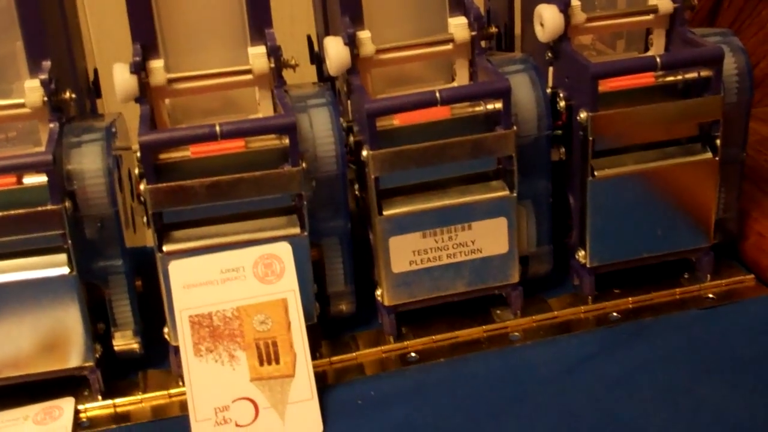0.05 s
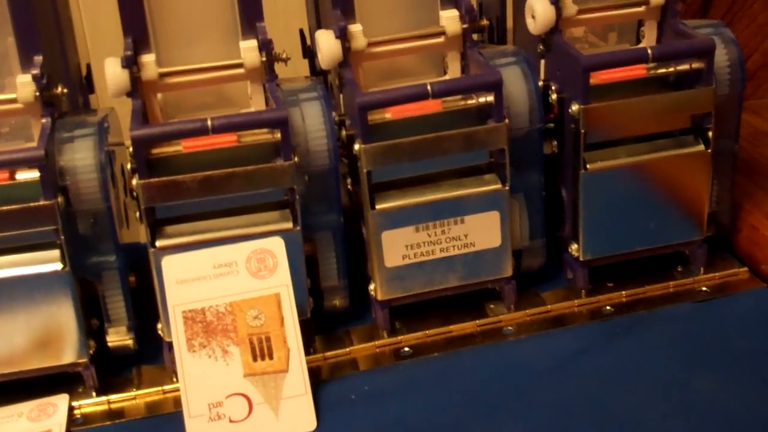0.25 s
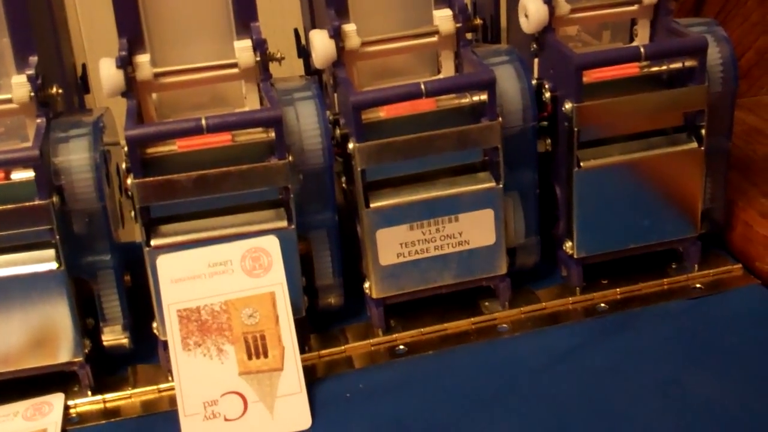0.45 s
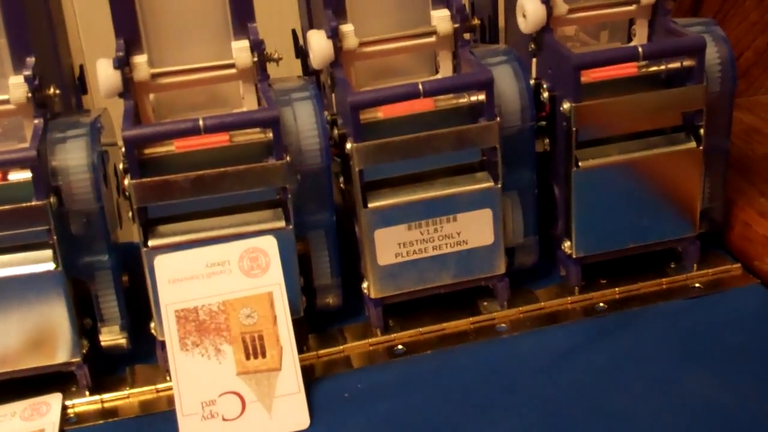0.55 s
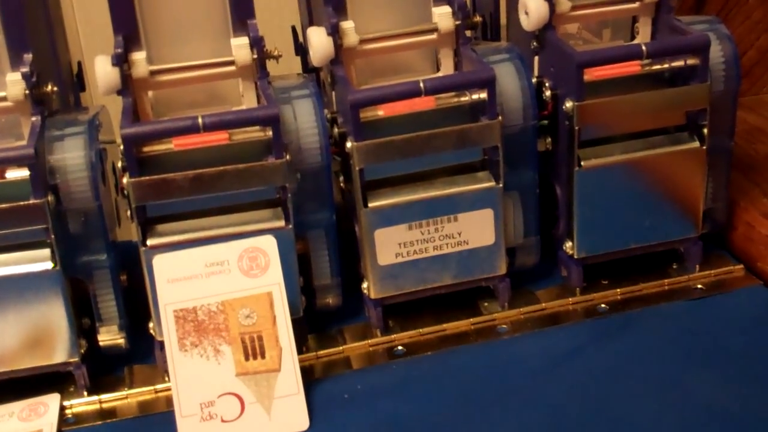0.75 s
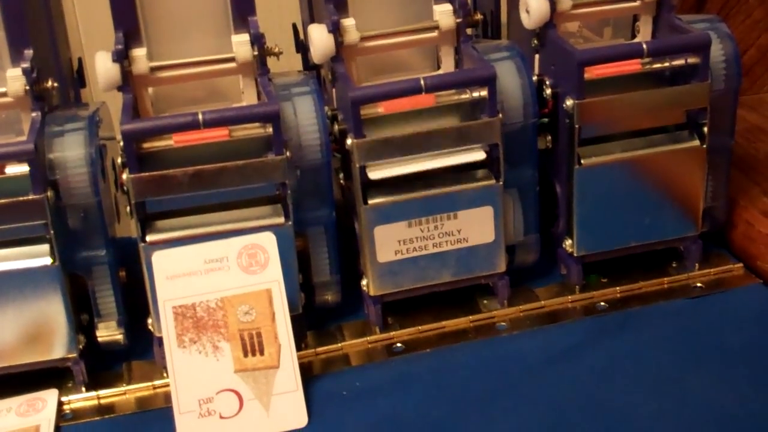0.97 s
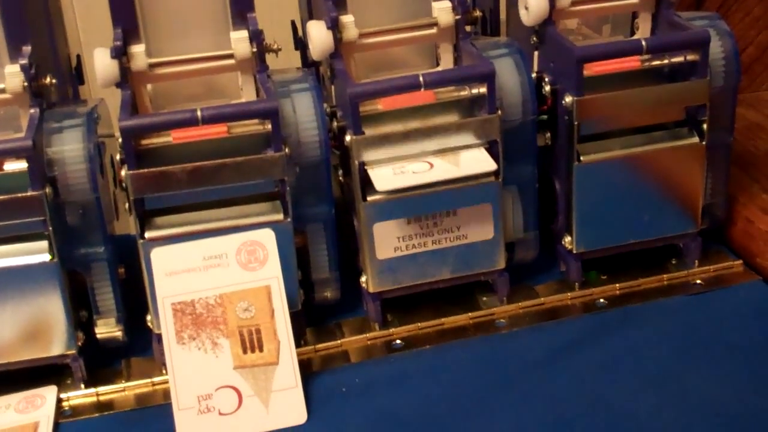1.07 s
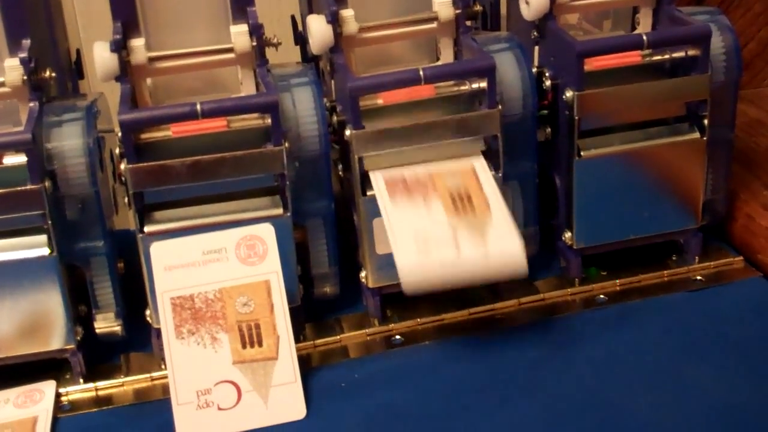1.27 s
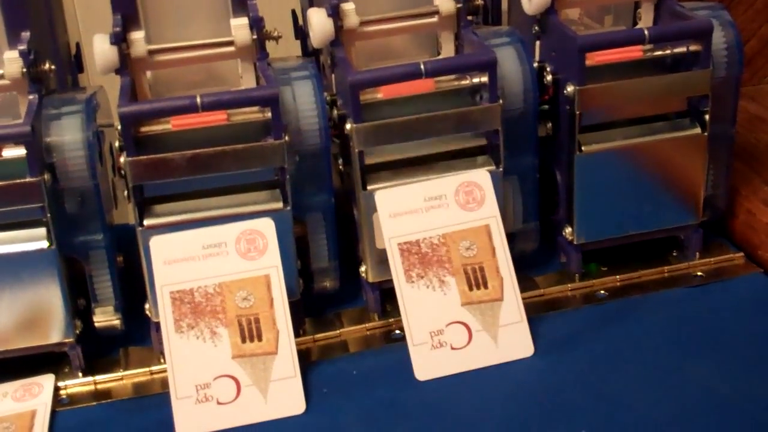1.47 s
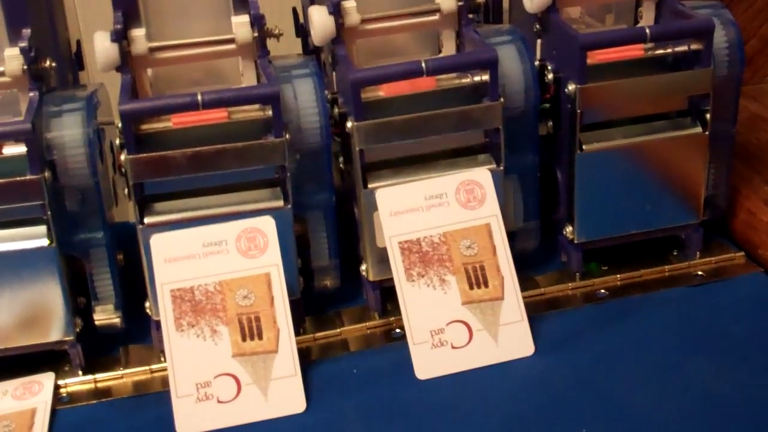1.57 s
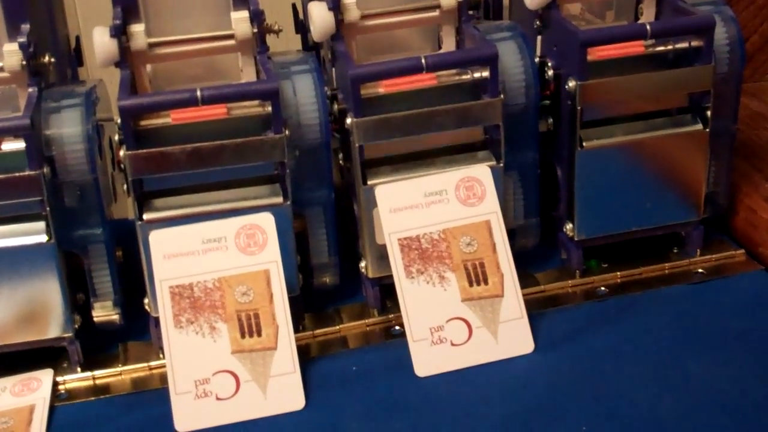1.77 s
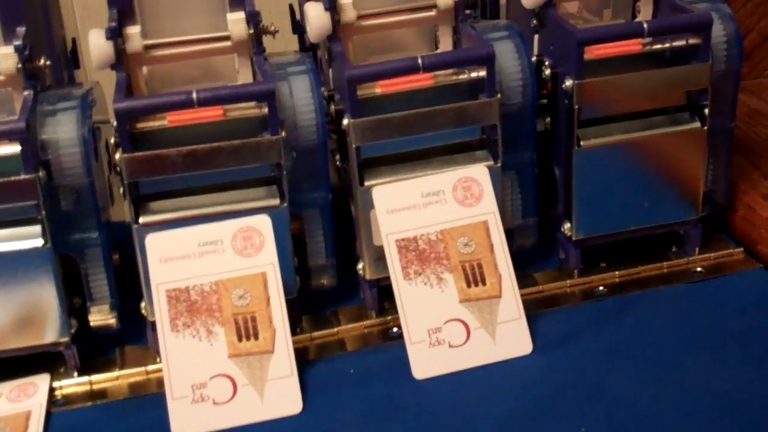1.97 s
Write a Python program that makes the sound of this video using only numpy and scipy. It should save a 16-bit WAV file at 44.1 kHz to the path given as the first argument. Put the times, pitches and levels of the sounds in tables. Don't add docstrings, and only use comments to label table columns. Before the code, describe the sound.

Close stereo microphone in a quiet room with faint hum: a tabletop card dispenser whirs, labours with a harsher whine and sharp card clicks, recovers its speed with light crackles and squeal, then cuts out abruptly.

```python
import sys
import numpy as np
from scipy import signal
from scipy.fft import rfft, irfft, next_fast_len
from scipy.io import wavfile

SR = 44100
rng = np.random.default_rng(int(sys.argv[2]) if len(sys.argv) > 2 else 0)


def log_audio(samples):
    frames = np.atleast_2d(samples).T
    limited = np.clip(frames, -1, 1)
    pcm = np.round(limited * 32767).astype(np.int16)
    wavfile.write(sys.argv[1], SR, pcm)


def ratio(d):
    e = np.asarray(d, float) / 20
    return 10 ** e


N = 88993
PAD = next_fast_len(N + SR // 2)
HZ = np.maximum(np.arange(PAD // 2 + 1) * SR / PAD, 1)
T = np.arange(N) / SR
TOP_HZ = 14250
STOP_S, RATTLE_DIES_DB_PER_S = 1.7875, 384
TEETH = 27

# (time [s], tooth rate [Hz], whine strength [dB],
# lift of second partial [dB], of first [dB], of fourth [dB])
MESH = [(.3, 1074, -16, 2, -2, 3), (.695, 1070, -12.5, -4, -1.5, 0), (.715, 1010, -3, 19.5, -9, 4),
        (.735, 994, 1, 0, 2, 14), (.765, 957, 3.5, 7, 2, 16), (.795, 899, 3, 5, -4.5, 9),
        (.9, 915, -0.5, -1.5, -1.5, -11), (1.045, 893.5, 1, 4.5, 4, 2), (1.17, 907, -2.5, 3, 1, 14),
        (1.22, 918, -7, 13, 7.5, 19), (1.265, 954, 1, 7, 2.5, 4), (1.295, 951, -0.5, 14, 7, -3),
        (1.325, 990, -18, 14, -2, 4), (1.39, 1055, -9.5, -1, -3, -3), (1.53, 1068, -11.5, 0, -5.5, -2),
        (1.62, 1078, -7, -7, 0.5, -1), (1.71, 1077, -9.5, -4, -1, -1), (1.77, 1070, -16, -2, -7, -1)]
# (time [s], brush hiss [dB], housing rattle [dB])
DRIVE = [(0, -27.5, -31), (.11, -27.5, -31), (.24, -28, -26.5), (.41, -28.5, -27.5), (.67, -27.5, -30),
         (.76, -30, -28), (.84, -27, -30.5), (.87, -35, -37), (.95, -30, -30), (1.15, -28, -29.5),
         (1.295, -29, -32), (1.31, -34.5, -37), (1.46, -32.5, -35.5), (1.52, -34.5, -37),
         (1.62, -29.5, -30), (1.72, -30, -31.5), (1.785, -30.5, -29)]


def rms_one(x):
    return x / np.sqrt(np.mean(x ** 2) + 1e-20)


def in_time(rows):
    s, *columns = np.transpose(rows)
    return [np.interp(T, s, c) for c in columns]


def over_hz(points):
    hz, value = np.transpose(points)
    return np.interp(np.log(HZ), np.log(np.maximum(hz, 1)), value)


def colour(x, response):
    return irfft(rfft(x, PAD) * response, PAD)[..., :N]


def low_cut(hz, order=4):
    return 1 / (1 + (hz / HZ) ** order)


def high_cut(hz, order=4):
    return 1 / (1 + (HZ / hz) ** order)


def resonance(hz, width_hz):
    return 1 / (1 + (2 * (HZ - hz) / width_hz) ** 2)


def bumps(peaks, lift_db):
    top = max(db for _, _, db in peaks)
    humps = sum(ratio(2 * (lift_db + .5 * (db - top))) * resonance(hz, width) for hz, width, db in peaks)
    return np.sqrt(1 + humps)


def drift(rate_hz):
    return rms_one(colour(rng.standard_normal(N), high_cut(rate_hz, 2) * (HZ > 1.5)))


def grit(spread_db):
    return rng.standard_normal(N) * ratio(spread_db * np.minimum(rng.exponential(1, N), 4))


def band(hz, width_hz):
    return rms_one(colour(grit(3), resonance(hz, width_hz) * low_cut(1500)))


def room():
    # (frequency [Hz], level [dB per Hz])
    air_colour = [(25, -22), (70, -35), (110, -22.5), (230, -21.5), (377, -18.5), (778, -16), (2820, -23),
                  (14000, -23.5)]
    # (frequency [Hz], rms level [dB])
    hum_tones = [(120, -71), (221, -80.5), (7850, -72)]
    air_db = -58.5
    mid, side = colour(rng.standard_normal((2, N)), ratio(over_hz(air_colour)) * (HZ < TOP_HZ))
    side = colour(side, 0.14 + 1.5 * high_cut(3000, 2))
    out = ratio(air_db) * (mid + side * [[1], [-1]]) / np.std(mid)
    for hz, db in hum_tones:
        phase = 2 * np.pi * hz * T + [[.2], [-.2]]
        out = out + np.sqrt(2) * ratio(db + 1.1 * drift(5.5)) * np.sin(phase)
    return out


def thumps():
    # (time [s], level [dB], mode [Hz], t60 [s])
    knocks = [(.8495, -31, 700, 0.03), (1.899, -52, 2700, 0.03), (1.3590, -14, 3500, 0.02),
              (1.3602, -13, 2400, .006), (1.3602, -30, 1150, .012), (1.3604, -11, 4900, .005),
              (1.3608, -15, 7600, .006), (1.3600, -12, 13500, .008), (.9236, -15, 13900, .013),
              (.8502, -17, 8900, .006), (.8500, -17, 11800, .006), (.9248, -21, 8600, .009),
              (.924, -24, 4400, .01)]
    rise_s = .0004
    out = np.zeros(N)
    for s, db, hz, t60 in knocks:
        after = T - s
        level = ratio(db - 60 * np.maximum(after, 0) / t60)
        out += level * np.clip(after / rise_s, 0, 1) * np.sin(2 * np.pi * hz * after)
    return out


def snaps():
    # (time [s], peak [dB], decay [s], brightness [dB])
    catches = [(0.617, -15, 0.0055, 2), (0.844, -15.5, 0.01, 1), (0.8482, -8.5, 0.0063, 5),
               (0.9243, -16, 0.0055, 6), (0.986, -18, 0.0056, 6), (1.3168, -19, 0.0056, 6),
               (1.3340, -16.5, 0.015, 2.5), (1.3593, -6, 0.0073, 2.5), (1.4098, -14, 0.0065, 2.5),
               (1.433, -21, 0.0058, 3), (1.4575, -18, .006, 9), (1.4700, -15.5, 0.0099, 3),
               (1.5, -27, 0.0072, 2), (1.5423, -17.5, 0.0067, 5), (1.5545, -20, 0.0078, 2),
               (1.6146, -17, .006, 0), (1.628, -15, .006, 0), (1.645, -20, .008, 4),
               (1.672, -23, 0.0074, 1), (1.7754, -23, 0.0058, -5.5)]
    # (frequency [Hz], level [dB per Hz])
    snap_colour = [(200, -26.5), (1450, -16), (2410, -7), (3460, -1.5), (6070, -13.5), (13500, -10),
                   (15300, -44), (16800, -40)]
    crack_db, crack_late_s, rise_s = 7, .0012, 0.00091
    length = 4000
    out, base = np.zeros(N + length), grit(1.0)
    t = np.arange(length) / SR
    for s, db, dies, tilt_db in catches:
        i = int(s * SR)
        envelope = ratio(-60 * t / max(4 * dies, .003)) * np.minimum(t / rise_s, 1)
        burst = base[i - 1:i + length] * np.append(0, envelope)
        burst[int(crack_late_s * SR)] -= ratio(crack_db)
        tilted = burst[1:] - np.clip(tilt_db / 6, -1, 1) * burst[:-1]
        out[i:i + length] += ratio(db - 5) * tilted
    shape = ratio(over_hz(snap_colour))
    return colour(out[:N], shape / np.sqrt(np.mean(shape ** 2)) * (1 - 0.68 * (HZ > TOP_HZ)))


def card_rub(wander):
    # (frequency [Hz], width [Hz], level [dB])
    flap = [(5070, 260, -42), (11000, 300, -60)]
    mesh_hz, strength_db, *_ = in_time(MESH)
    load = np.clip((1060 - mesh_hz) / 50, 0, 1)
    rub = ratio(-34.5) * band(4200, 760)
    rub = rub + sum(ratio(db) * band(hz, width) for hz, width, db in flap)
    return rub * ratio(0.047 * strength_db + 0.88 * wander) * load * (T < 1.305)


def roller_skid():
    # (time [s], level [dB])
    skid = [
        (1.44, -60),
        (1.47, -44),
        (1.56, -37),
        (1.64, -32.5),
        (1.69, -39),
        (1.73, -33.5),
        (1.78, -45),
        (1.81, -68),
    ]
    # (frequency [Hz], width [Hz], level [dB])
    squeal_bands = [(10630, 500, -0.5), (11440, 400, -6), (12587, 2500, 0), (9400, 660, -4.5)]
    level = ratio(in_time(skid)[0]) * (T > skid[0][0]) * (T < skid[-1][0])
    return level * sum(ratio(db) * band(hz, width) for hz, width, db in squeal_bands)


def motor_can():
    # (frequency [Hz], width [Hz], level [dB])
    can_modes = [(519, 26, -6), (709, 48, -4.5), (792, 68, 1), (1007, 28, -12), (1070, 32, 6.5),
                 (1246, 41, -1), (1466, 49, 11.5), (1557, 320, 5.5)]
    drone = rms_one(colour(grit(0.99), bumps(can_modes, lift_db=17.5) * low_cut(470, 12) * high_cut(1900)))
    hiss_db = in_time(DRIVE)[0]
    return drone * ratio(-45.5 + (hiss_db + 29) + 5.7 * T / 2)


def gear_rattle(wander):
    # (frequency [Hz], level [dB per Hz])
    rattle_colour = [(300, -27), (1200, -41), (1650, -19), (1950, -4.5), (2400, -3.5), (3500, -3.5),
                     (4300, -5), (6000, -10)]
    # (frequency [Hz], width [Hz], level [dB])
    housing = [(1890, 47, -1), (2084, 99, -2), (2244, 67, -2.5), (2341, 23, 5.5), (2377, 20, -5),
               (2495, 47, 6), (2610, 22, -3.5), (2902, 87, 1.5), (2950, 27, 3.5), (3185, 13, -4),
               (3420, 31, -0.5), (3540, 65, -0.5), (3646, 23, 2), (3877, 60, -2)]
    response = ratio(over_hz(rattle_colour)) * bumps(housing, lift_db=10.0) * high_cut(6000)
    return rms_one(colour(grit(2.2), response)) * ratio(in_time(DRIVE)[1] + 1.18 * wander)


def brush_hiss(shaft, wander):
    # (frequency [Hz], level [dB per Hz])
    hiss_colour = [(3000, -7), (5360, -11.5), (6580, -10), (8000, -8.5), (9970, -10), (11700, -7.5),
                   (13000, -10.5), (14200, -5.5)]
    # (frequency [Hz], width [Hz], level [dB])
    shell = [(6510, 47, 8.5), (6830, 54, 3), (7300, 82, -6), (8350, 37, 4), (9300, 61, 1), (10700, 110, 3),
             (11400, 340, 0), (10800, 24, 6.5), (12640, 140, 6)]
    poles, pole_depth, turn_depth, dies_db_per_s = 9, 0.2, 0.15, 650
    pole_beat = 1 + pole_depth * (T < .75) * np.cos(2 * np.pi * poles * shaft)
    turn_beat = 1 + turn_depth * np.cos(2 * np.pi * shaft)
    response = ratio(over_hz(hiss_colour)) * bumps(shell, lift_db=6.5) * low_cut(3800) * (HZ < TOP_HZ)
    hiss = rms_one(colour(grit(1.2) * pole_beat * turn_beat, response))
    after = np.maximum(T - STOP_S, 0)
    return hiss * ratio(in_time(DRIVE)[0] + 1.1 * wander - dies_db_per_s * after)


def whir(shaft, wander):
    body = gear_rattle(wander[1]) + motor_can()
    body = body * ratio(-RATTLE_DIES_DB_PER_S * np.maximum(T - STOP_S, 0))
    out = brush_hiss(shaft, wander[0]) + roller_skid() + body + card_rub(wander[0])
    return colour(out, HZ < TOP_HZ)


def turns():
    return np.cumsum(in_time(MESH)[0] * (1 + 0.003 * drift(40))) / SR / TEETH


def whine(shaft):
    # (multiple of tooth rate, level loaded [dB], level free [dB])
    partials = [(1, -48, -35.5), (2, -42, -50), (3, -33, -50), (4, -51, -60), (5, -58, -60)]
    # (teeth, rms level [dB], sings until [s])
    idler = (25, -54.5, .72)
    flutter_hz, stop_fade_s = 45, 0.038
    mesh_hz, strength_db, second_db, first_db, fourth_db = in_time(MESH)
    load = np.clip((1040 - mesh_hz) / 30, 0, 1)
    lift_db = [first_db, second_db, 0, fourth_db, .5 * fourth_db]
    flutter_db = 2 * (.4 + .5 * load)
    fade = np.clip((STOP_S - T) / stop_fade_s, 0, 1)
    out = np.zeros(N)
    for k, loaded_db, free_db in partials:
        level_db = strength_db + load * loaded_db + (1 - load) * free_db + lift_db[k - 1]
        tone = np.sqrt(2) * np.sin(2 * np.pi * k * TEETH * shaft + k * k)
        out += tone * fade * ratio(level_db + flutter_db * drift(flutter_hz))
    idler_teeth, idler_db, until_s = idler
    song = np.sqrt(2) * np.sin(2 * np.pi * idler_teeth * shaft)
    return out + song * ratio(idler_db + 1.5 * drift(30)) * (T < until_s)


def tail(t60):
    t = np.arange(SR // 2) / SR
    x = rng.standard_normal(len(t)) * ratio(-60 * t / t60)
    return rfft(x / np.sqrt(np.sum(x ** 2)), PAD)


def ports(shared, scattered):
    # (frequency [Hz], left-right likeness [0-1])
    likeness = [(500, .9), (1000, .94), (2000, .9), (4000, .68), (8000, .74), (14000, .66)]
    # (frequency [Hz], left leads by [radians])
    lead = [(1000, 0), (2500, .1), (5400, -.3), (6700, -1.0), (7800, -.9), (10500, -1.5), (12800, -2.3),
            (15100, -3.3)]
    # (frequency [Hz], left minus right [dB])
    balance = [(60, -1.0), (180, -26), (540, 1), (1640, -1), (4940, 1.5), (14900, 0.0)]
    echo_db, echo_t60_s, mic_cut_hz, port_db = -13.5, 0.23, 384, 1.08
    alike = np.clip(over_hz(likeness), 0, 1)
    sign = np.array([[1], [-1]])
    place = np.exp(.5j * sign * over_hz(lead)) * ratio(.5 * sign * over_hz(balance)) * low_cut(mic_cut_hz)
    mid = place * np.sqrt((1 + alike) / 2) * (1 + ratio(echo_db) * tail(echo_t60_s))
    side = place * np.sqrt((1 - alike) / 2) * (1 + ratio(echo_db) * tail(echo_t60_s))
    return ratio(port_db) * (colour(shared, mid) + sign * colour(scattered, side))


def scene():
    shaft, wander = turns(), [drift(19), drift(36)]
    tones = whine(shaft) + thumps()
    shared = whir(shaft, wander) + tones + snaps()
    scattered = whir(shaft, wander) + colour(tones, 1j * ratio(-0.5)) + snaps()
    return ports(shared, scattered) + room()


def low_pass(x):
    return signal.sosfilt(signal.butter(12, 14450, fs=SR, output="sos"), x)


def record(dry):
    ceiling = 1.3
    return low_pass(ceiling * np.tanh(dry / ceiling))


dry = scene()
out = record(dry)
log_audio(out)
```